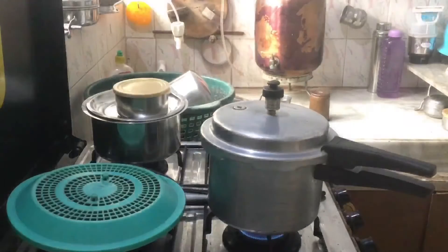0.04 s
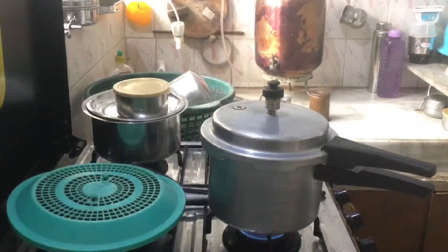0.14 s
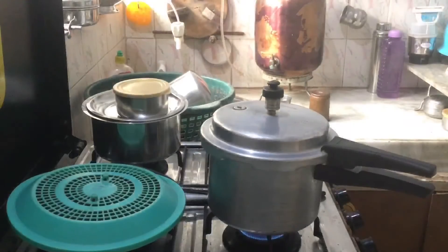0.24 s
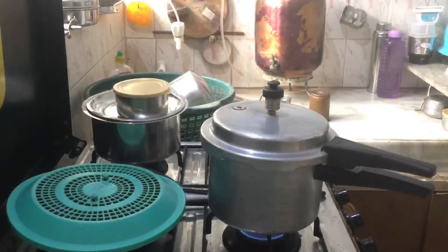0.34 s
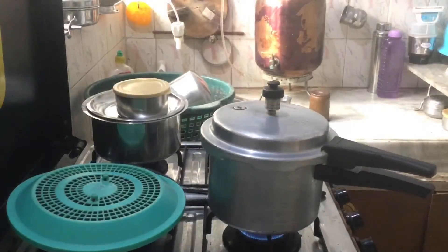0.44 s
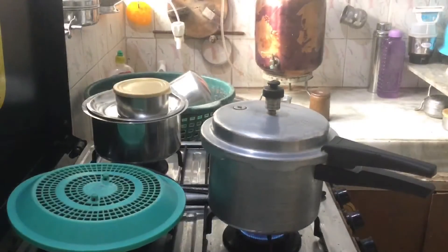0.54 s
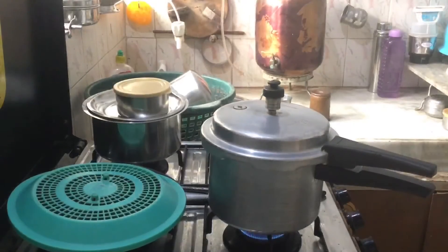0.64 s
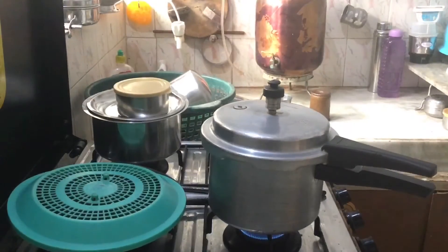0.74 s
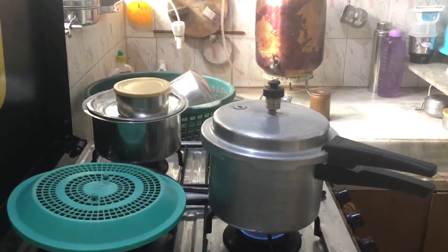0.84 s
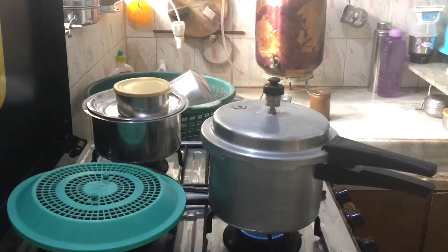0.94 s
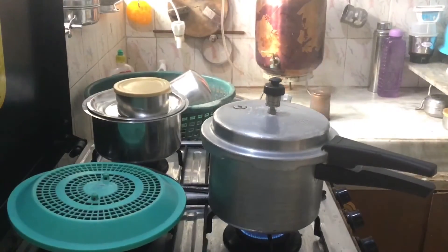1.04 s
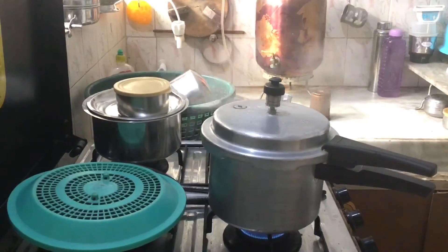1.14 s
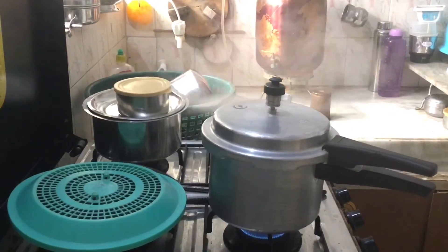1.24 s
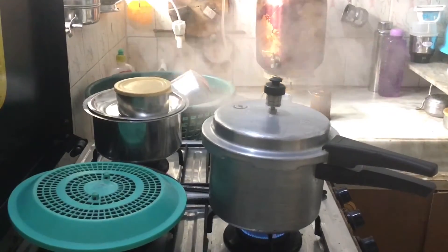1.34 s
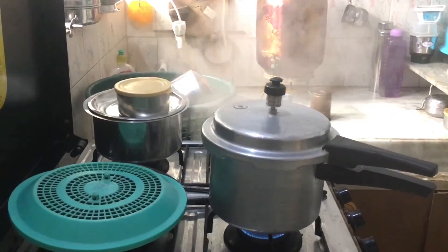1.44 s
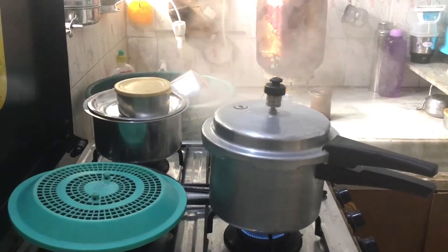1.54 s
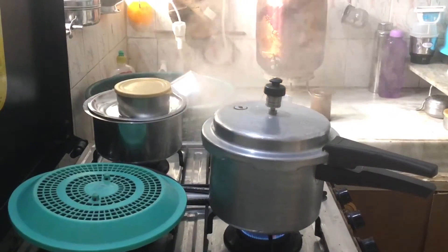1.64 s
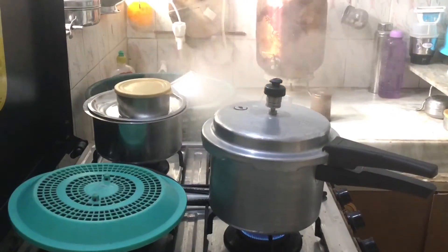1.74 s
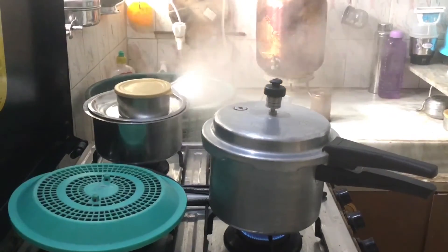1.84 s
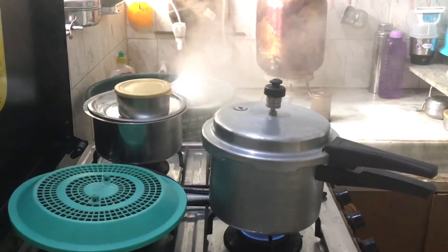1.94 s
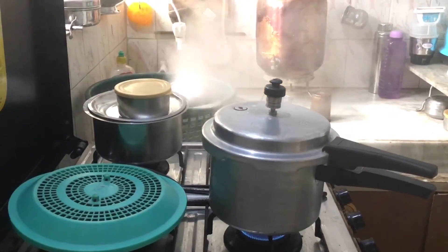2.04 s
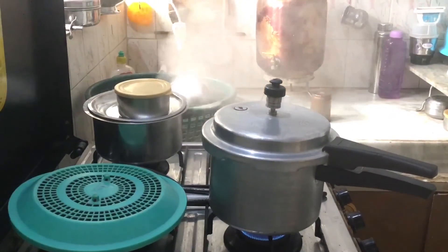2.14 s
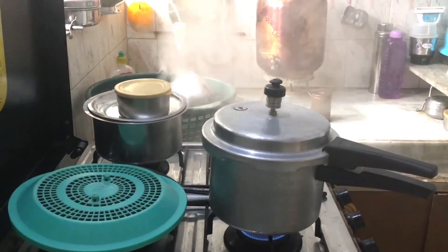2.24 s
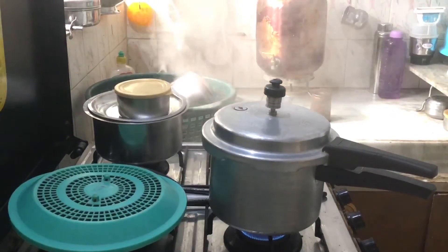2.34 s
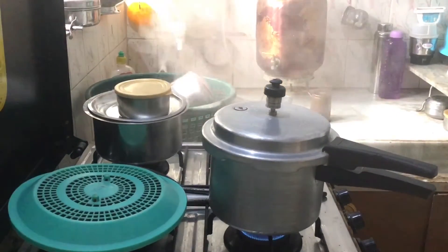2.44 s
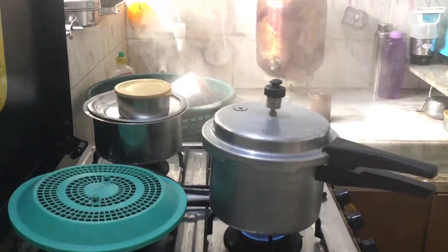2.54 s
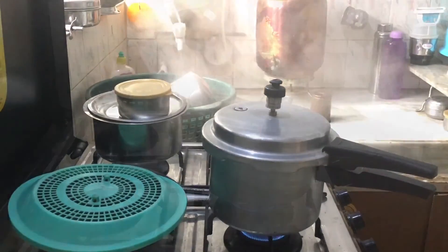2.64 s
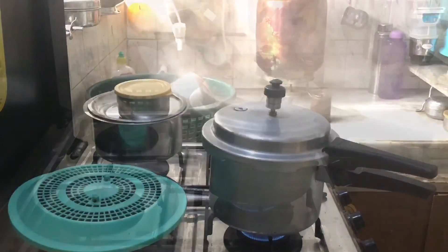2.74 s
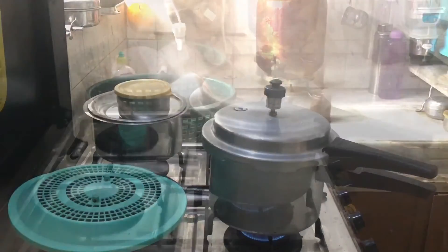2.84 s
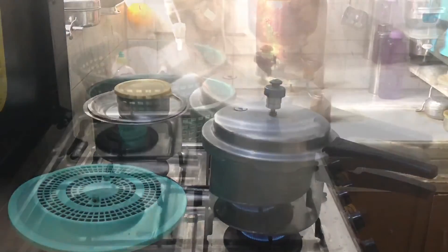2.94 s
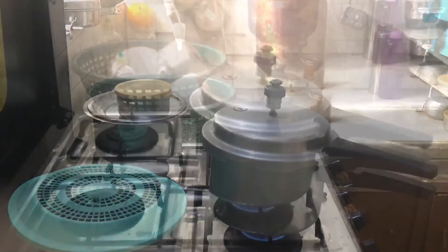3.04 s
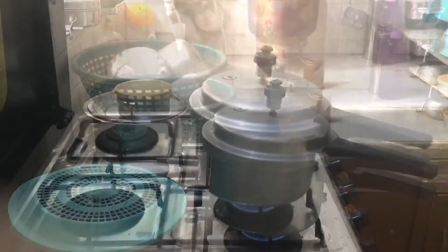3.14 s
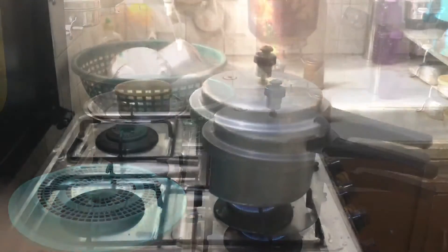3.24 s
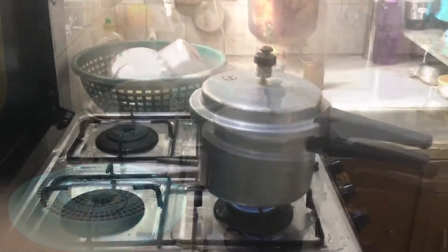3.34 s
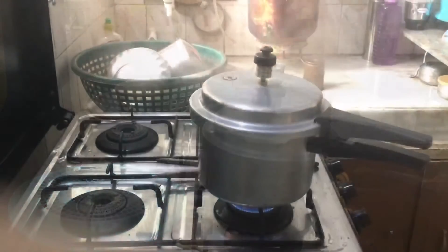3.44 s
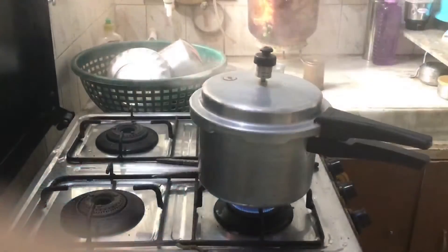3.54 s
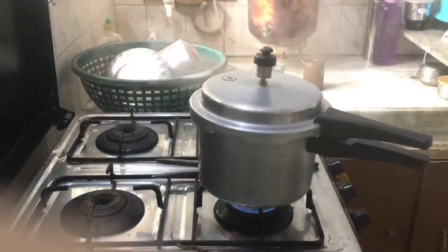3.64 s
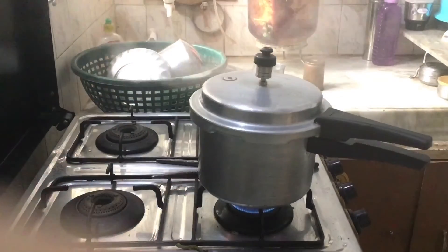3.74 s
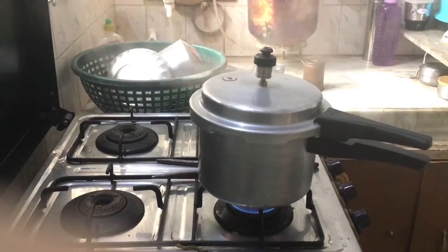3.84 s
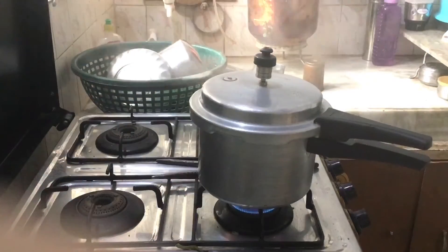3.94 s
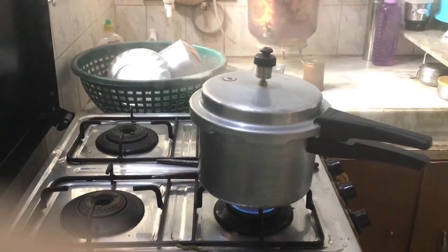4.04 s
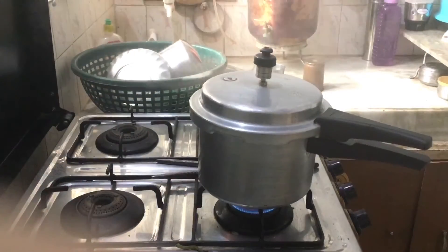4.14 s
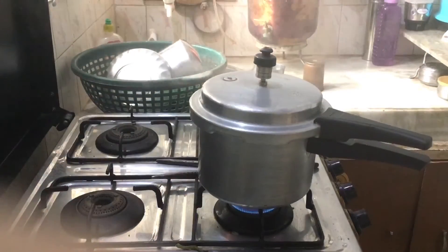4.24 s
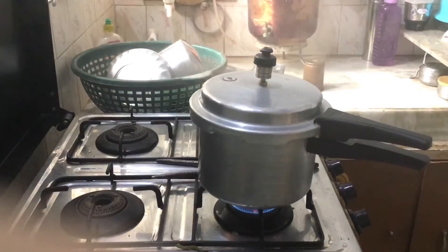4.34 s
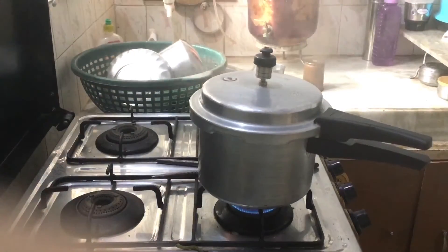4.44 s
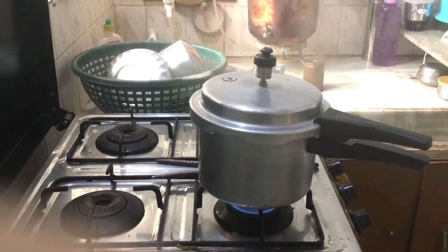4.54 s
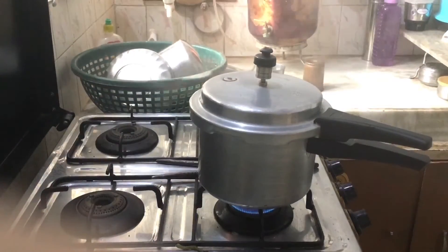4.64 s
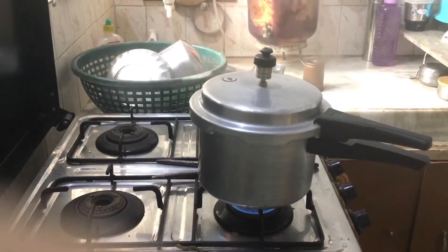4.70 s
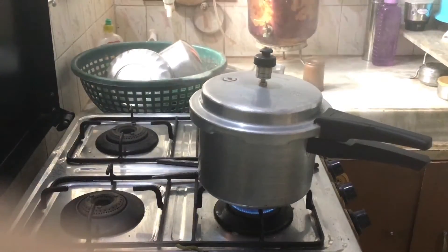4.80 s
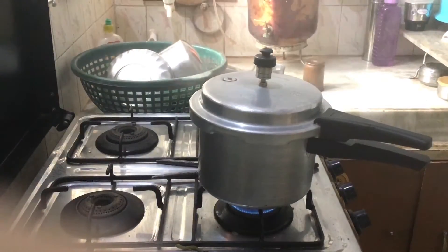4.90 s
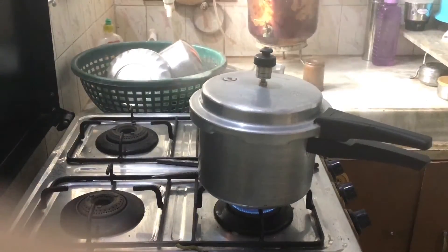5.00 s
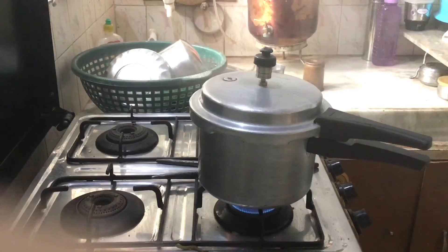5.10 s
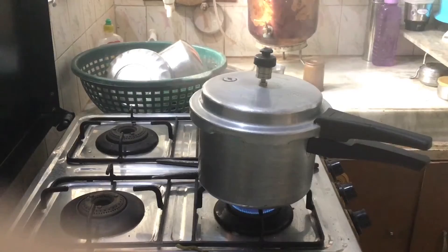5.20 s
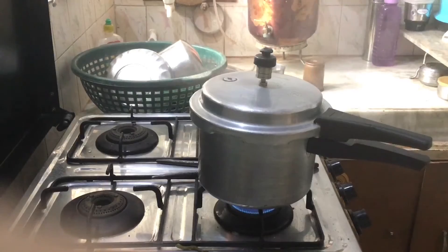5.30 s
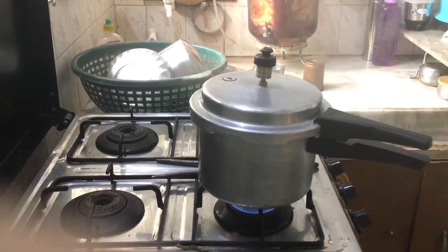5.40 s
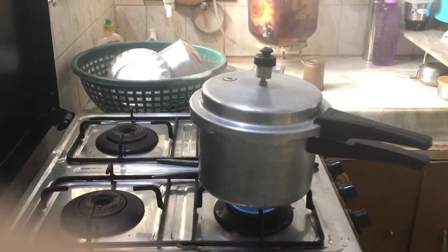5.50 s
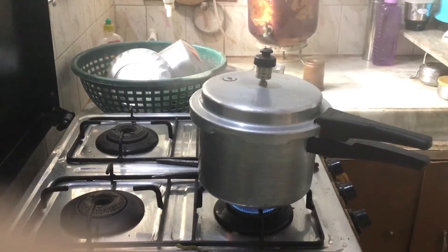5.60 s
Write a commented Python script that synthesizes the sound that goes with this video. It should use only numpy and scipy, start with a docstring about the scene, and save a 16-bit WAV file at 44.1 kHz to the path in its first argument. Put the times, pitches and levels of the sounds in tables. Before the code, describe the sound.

At the start, steam seeps under the weight valve of a pressure cooker with a soft, thin, slightly pulsing hiss that swells briefly around 0.4 seconds. Beneath it are the faint rumble of a gas burner and a low, wavering hum. At about 0.9 seconds the weight lifts with a short, hollow, wet puff and a little spray, and by one second a loud, bright jet of steam is rushing out. The jet flutters very slightly and sinks slowly in level as the pressure drains. Between about 2.6 and 3.5 seconds the hiss blends smoothly into a somewhat different tone, as though heard from a second spot near the stove. It carries on, still loud, until the end at around 5.6 seconds. The sound is mono, from one microphone, coloured by the short reflections of a tiled kitchen.

```python
"""Steam seeps under the weight valve of a pressure cooker, on a gas stove in a tiled kitchen.
Just before one second the weight lifts with a wet puff and lets out a loud jet, which sags slowly
as the pressure drains. Valve, lid and tiles colour the hiss. Around three seconds the sound blends
over to a second listening spot near the stove. Underneath, the burner rumbles and a low hum wavers.
One mono microphone."""
import sys
import numpy as np
from scipy import signal
from scipy.fft import rfft, irfft, next_fast_len
from scipy.io import wavfile
from scipy.ndimage import uniform_filter1d, map_coordinates

SR = 44100
rng = np.random.default_rng(int(sys.argv[2]) if len(sys.argv) > 2 else 0)


def store_wav(level_fs):
    """Save 16-bit WAV to argv[1]."""
    pcm = np.round(np.clip(np.atleast_2d(level_fs), -1, 1) * 32767)
    wavfile.write(sys.argv[1], SR, pcm.T.astype(np.int16))


N = 249826


def steam(flutter_db=0.11, sputter_db=0.38, seated_db=-38, lifted_db=-27, second_spot_db=0.11):
    """Steam squeezes through a slit at low flow, then jets out, fluttering as the weight rocks on it."""
    # broad spectrum of the hiss at each spot: f/Hz, relative level/dB
    first_hiss = [(60, -69), (250, -40.5), (500, -21.5), (1000, -24), (1500, -22.5), (2050, -11),
                  (2400, -0.7), (3500, -8.5), (5000, -2), (7000, -4.5), (9300, 1), (10100, -5.5),
                  (12500, -10.5), (15600, -11)]
    second_hiss = [(60, -58), (250, -33.5), (500, -26), (1000, -29), (1500, -30.5), (2050, -22.5),
                   (2400, -7.5), (3500, -11.5), (5000, -1), (7000, -6.5), (9300, -9), (10100, -13),
                   (12500, -19), (14000, -15), (15600, -11.5)]
    # resonances of valve, lid and tiled corner at each spot: f/Hz, width/Hz, lift/dB
    first_peaks = [(692, 210, 7.6), (798, 63, 6.5), (1183, 300, 11), (1590, 170, 4.5), (1822, 224, 10),
                   (2300, 30, 1.5), (2784, 98, 4), (3018, 520, 9.5), (3430, 82, 6.5), (3613, 316, 9.5),
                   (3845, 135, 5.5), (4320, 71, 4), (4560, 750, 4), (6165, 430, 7.5), (6650, 330, 6),
                   (7160, 110, 6), (7820, 420, 7), (8560, 630, 3), (13832, 445, 0.5)]
    second_peaks = [(663, 78, 5.2), (790, 123, 10.2), (1200, 254, 9.2), (1765, 550, 9.8), (1796, 134, 7.7),
                    (2310, 38, 3.8), (2815, 184, 6.6), (3283, 310, 8.9), (3577, 210, 6), (3870, 220, 3.8),
                    (4260, 270, 3.8), (4670, 120, 4.8), (8000, 130, 2.3), (8400, 50, 3.8), (8800, 400, 6.6),
                    (9576, 252, 3.8), (10860, 700, 3), (11600, 300, 2.7), (12450, 481, 5.5),
                    (13300, 336, 4.0)]
    # extra colour of the narrow slit under the seated weight: f/Hz, gain/dB
    slit_colour = [(700, 7), (1800, 3), (2900, -2), (4700, 1), (5600, 2), (6100, 4), (6900, 0), (9300, 0),
                   (11000, 0), (14000, 4)]
    flow_db = valve_flow()
    lifted = np.clip((flow_db - seated_db) / (lifted_db - seated_db), 0, 1)
    slit = filtered(turbulence(patchy_db=1.3), lambda hz: amp(along(slit_colour, hz)))
    jet = np.sqrt(1 - lifted) * slit + np.sqrt(lifted) * turbulence(patchy_db=0.63)
    level = amp(flow_db + flutter_db * wobble(24.28) + sputter_db * wobble(170))
    first = level * coloured(jet, first_hiss, first_peaks)
    first = kitchen(first, wet_db=-9.0, t60=0.18)
    second = level * coloured(turbulence(patchy_db=0.54), second_hiss, second_peaks)
    second = kitchen(second, wet_db=-8.0, t60=0.37)
    return blend_spots(first, amp(second_spot_db) * second)


def valve_flow(seated_db=-42, rock_hz=8.3, rock_db=0.5, open_db=-20, sag_db_per_s=0.69):
    """Steam level in dB: a seep pulsing as the weight rocks, then a jet sagging as the pressure drains."""
    lift_s, opening_s = 0.84, 0.16
    t = np.arange(N) / SR
    surge_db = 5.5 * np.exp(-((t - 0.36) / 0.099) ** 2)  # the seep swells once, briefly
    seep_db = seated_db + surge_db + rock_db * np.sin(2 * np.pi * rock_hz * t)
    jet_db = open_db - sag_db_per_s * (t - lift_s - opening_s)
    opening = ramp(lift_s, opening_s)
    return (1 - opening) * seep_db + opening * jet_db


def puff(spatter_db=1.5):
    """The first rush blows condensed water out of the vent: a short hollow chuff, then thinning spray."""
    # spectrum of the wet puff: f/Hz, relative level/dB
    puff_colour = [(45, -40), (80, -11), (170, -11.5), (330, -12), (560, -13), (1050, -9.5), (1450, -11),
                   (1750, -8.5), (2100, -15), (2550, 2.5), (3100, -17), (4000, -34)]
    # resonances of the hollow under the weight: f/Hz, width/Hz, lift/dB
    hollow_peaks = [(665, 140, 12.5), (797, 130, 14.5)]
    chuff = coloured(turbulence(patchy_db=1.2), puff_colour, hollow_peaks)
    chuff *= puff_envelope(peak_db=-32, fall_db_per_s=135)
    spray = coloured(turbulence(patchy_db=3.5), puff_colour)
    spray *= puff_envelope(peak_db=-37.5, fall_db_per_s=29)
    return (chuff + spray) * amp(spatter_db * wobble(120))


def puff_envelope(peak_db, fall_db_per_s, start_s=0.93, attack_s=0.039, hold_s=0.033):
    """Once the gap is wide enough to throw water out: a quick attack, a brief hold, a steady fall in dB."""
    falling_s = np.maximum(np.arange(N) / SR - start_s - attack_s - hold_s, 0)
    return ramp(start_s, attack_s) * amp(peak_db - fall_db_per_s * falling_s)


def burner(level_db=-56):
    """The soft rumble of the gas flame under the pot, heard from each spot in turn."""
    # spectrum of the flame in the kitchen: f/Hz, relative level/dB
    flame_colour = [(22, -35), (42, -15), (60, -3.5), (110, 1), (190, -1), (260, -6.5), (350, -5.5),
                    (480, -11.5), (1000, -14), (3000, -25.5)]
    first, second = [coloured(turbulence(patchy_db=0.7), flame_colour) for spot in range(2)]
    return amp(level_db) * blend_spots(first, second)


def hum(drift=0.0148, waver_db=2.5):
    """A low hum in the background, its partials wavering in pitch and strength."""
    # swells and dips of the hum: t/s, level/dB
    hum_levels = [(0.0, -56), (0.04, -57), (0.31, -48.5), (0.66, -54.5), (0.84, -47), (1.15, -59),
                  (1.2, -51), (1.76, -64), (2.23, -55), (2.36, -77), (4.03, -62.5), (5.3, -72)]
    # its partials: f/Hz, relative level/dB
    partials = [(75.6, -1), (105, -10), (188.4, -14.5), (231.5, -22.5), (344.5, -15), (781, -23),
                (985, -20), (1227, -20)]
    clock = np.cumsum(1 + drift * wobble(9.8)) / SR  # all partials drift together
    tone = np.zeros(N)
    for hz, db in partials:
        strength = amp(db + waver_db * wobble(12))
        tone += strength * np.sin(2 * np.pi * (hz * clock + rng.random()))
    level_db = np.interp(np.arange(N) / SR, *np.transpose(hum_levels))
    return amp(level_db) * unit(tone)


def kitchen(x, wet_db, t60):
    """Dense reflections off the tiles reach the microphone and comb a fine, steady ripple into the sound."""
    t = np.arange(SR // 2) / SR
    tail = rng.standard_normal(len(t)) * amp(-60 * t / t60) * (t > .004)
    echo = signal.fftconvolve(x, tail / np.linalg.norm(tail))[:N]
    return (x + amp(wet_db) * echo) / np.sqrt(1 + amp(2 * wet_db))


def blend_spots(first, second):
    """The sound at the first listening spot fades out while that at the second fades in."""
    share = ramp(start_s=2.61, length_s=0.93)
    return (1 - share) * first + share * second


def turbulence(patchy_db):
    """White noise in which eddies briefly raise and lower patches of the spectrum."""
    spectra = signal.stft(rng.standard_normal(N), nperseg=512)[2]
    eddies = uniform_filter1d(rng.standard_normal(spectra.shape), size=12, axis=0)  # about 1 kHz wide
    eddies = uniform_filter1d(eddies, size=9, axis=1)  # about 50 ms long
    patchy = spectra * amp(patchy_db * unit(eddies))
    return unit(signal.istft(patchy, nperseg=512)[1][:N])


def coloured(x, spectrum, peaks=()):
    """x through a broad spectrum with resonances standing on it, at rms 1."""
    def response(hz):
        lift_db = sum(db / (1 + (2 * (hz - centre) / width) ** 2) for centre, width, db in peaks)
        return amp(along(spectrum, hz) + lift_db)
    return unit(filtered(x, response))


def filtered(x, response):
    """x through a gain given as a function of frequency."""
    size = next_fast_len(N + SR // 2)
    hz = np.fft.rfftfreq(size, 1 / SR)
    return irfft(rfft(x, size) * response(hz), size)[:N]


def along(points, hz):
    """Rows of (f/Hz, value) read on a log frequency axis."""
    knots_hz, values = np.transpose(points)
    return np.interp(np.log(hz + 1), np.log(knots_hz + 1), values)


def wobble(rate):
    """A smooth random curve, rate knots a second."""
    knots = rng.standard_normal(int(N * rate / SR) + 4)
    return map_coordinates(knots, [np.arange(N) * rate / SR])


def ramp(start_s, length_s):
    """A straight rise from 0 to 1."""
    return np.clip((np.arange(N) / SR - start_s) / length_s, 0, 1)


def amp(db):
    """Decibels to gain."""
    return 10 ** (np.asarray(db) / 20)


def unit(x):
    """x at rms 1."""
    return x / np.sqrt(np.mean(x ** 2) + 1e-20)


def scene():
    """Cooker, burner and hum reach one microphone, which feeds both channels."""
    mono = steam() + puff() + burner() + hum()
    return np.array([mono, mono])


def record(dry):
    """The recorder keeps nothing above its band limit."""
    top_hz = 15750
    return np.array([filtered(channel, lambda hz: hz < top_hz) for channel in dry])


dry = scene()
out = record(dry)
store_wav(out)
```